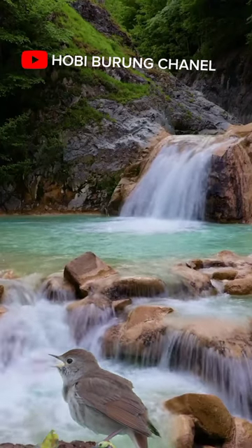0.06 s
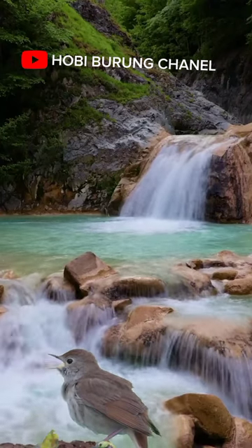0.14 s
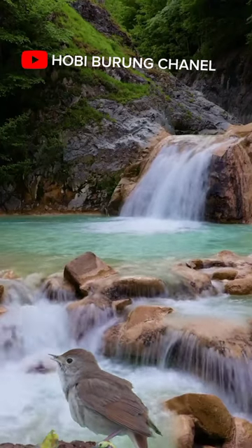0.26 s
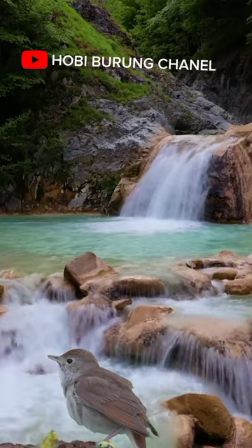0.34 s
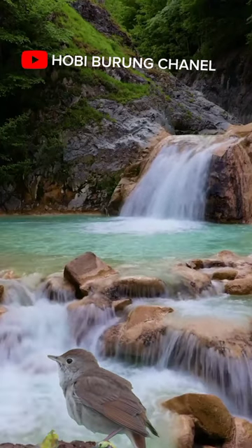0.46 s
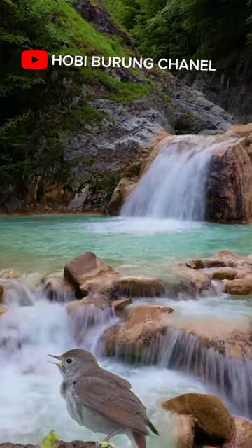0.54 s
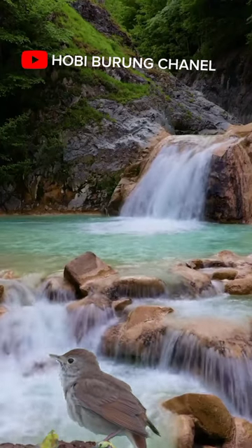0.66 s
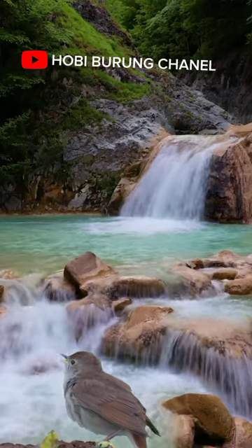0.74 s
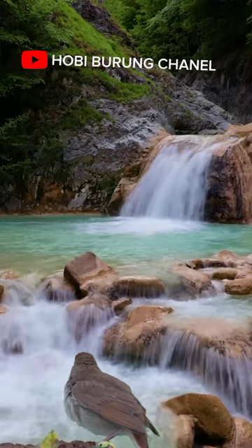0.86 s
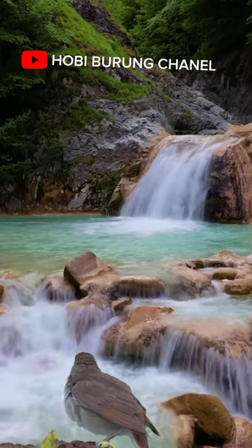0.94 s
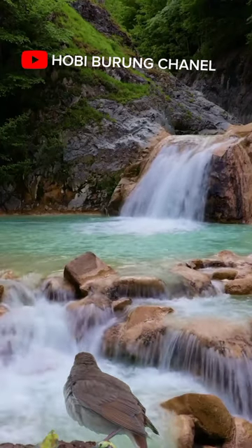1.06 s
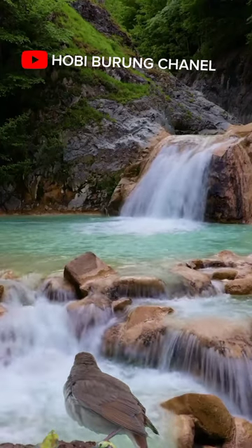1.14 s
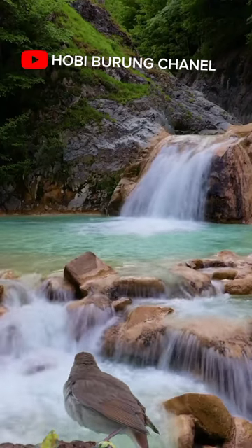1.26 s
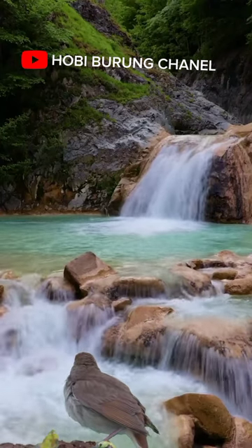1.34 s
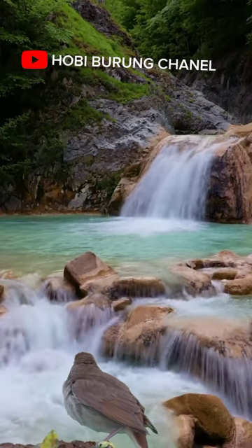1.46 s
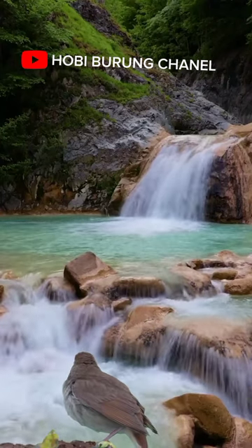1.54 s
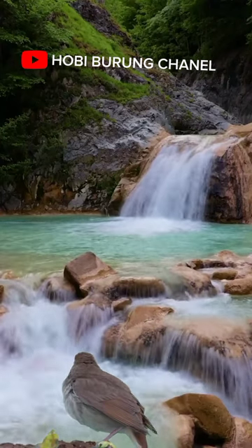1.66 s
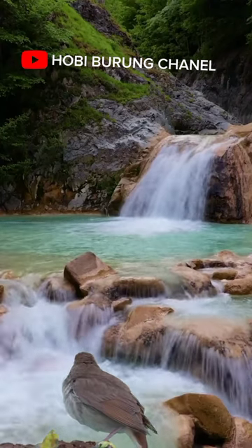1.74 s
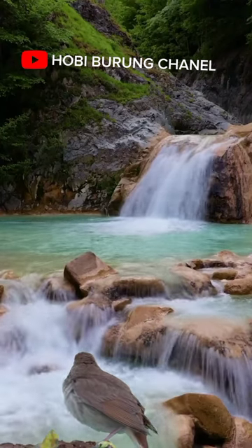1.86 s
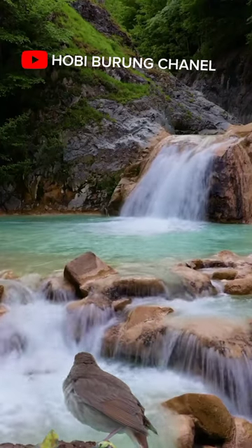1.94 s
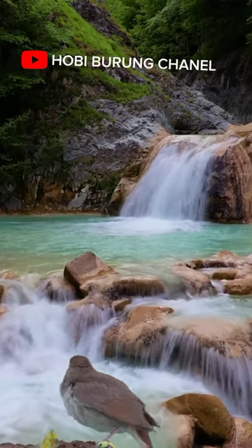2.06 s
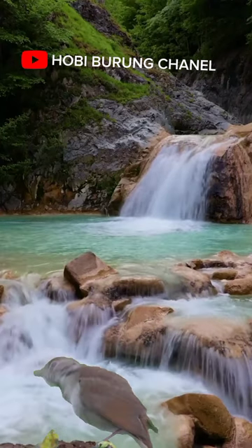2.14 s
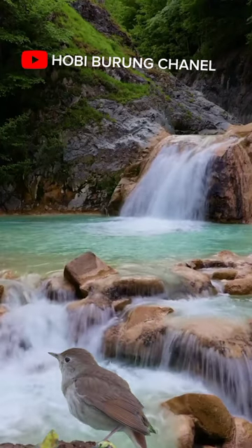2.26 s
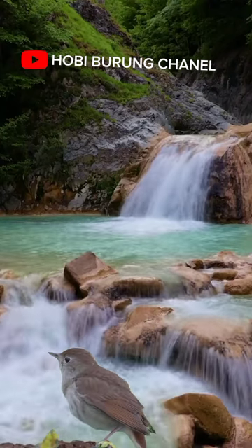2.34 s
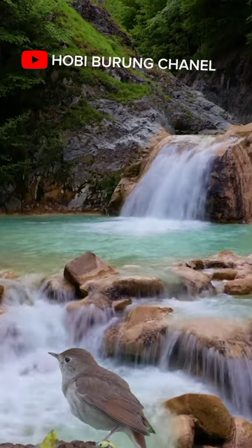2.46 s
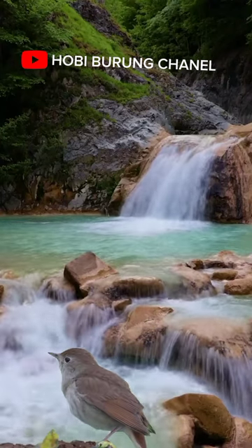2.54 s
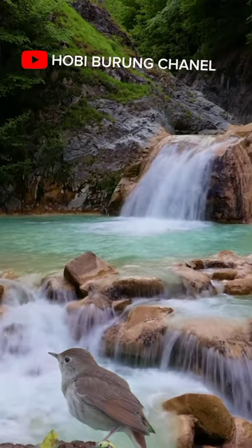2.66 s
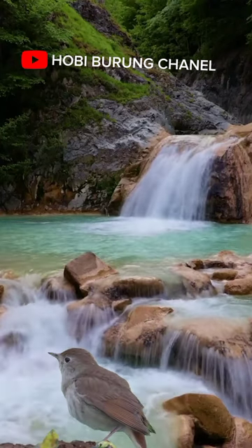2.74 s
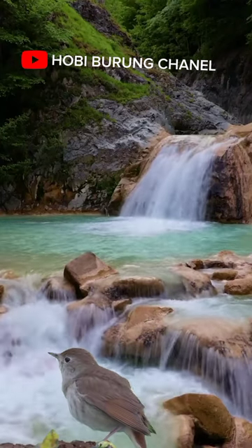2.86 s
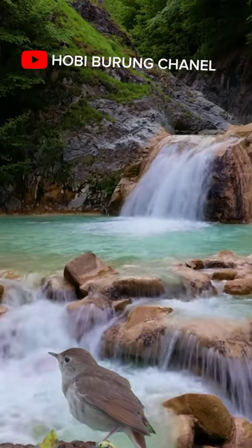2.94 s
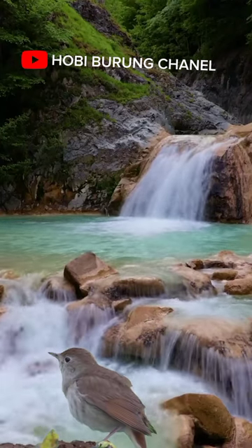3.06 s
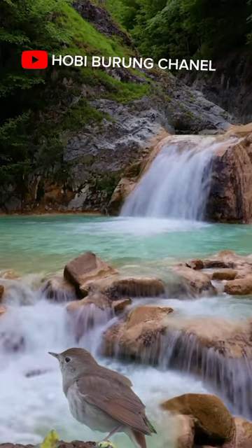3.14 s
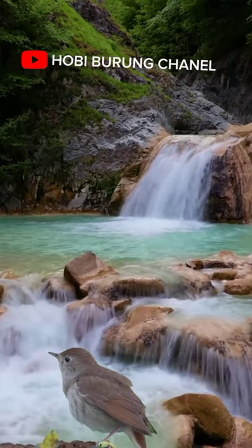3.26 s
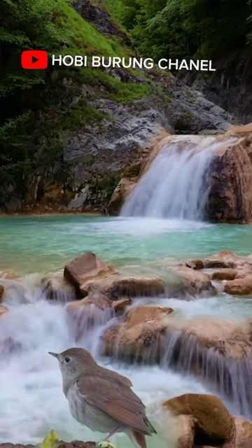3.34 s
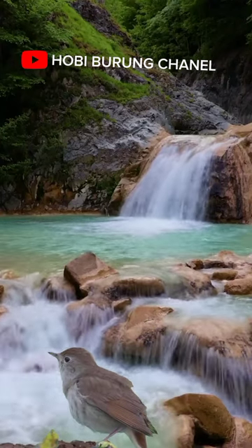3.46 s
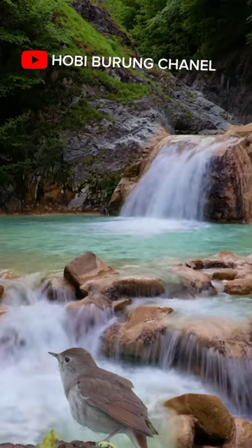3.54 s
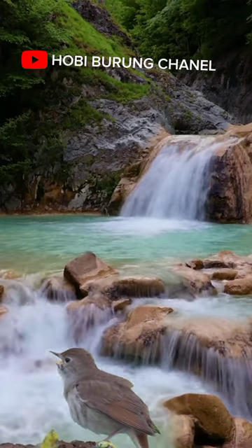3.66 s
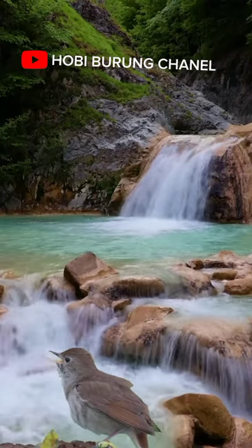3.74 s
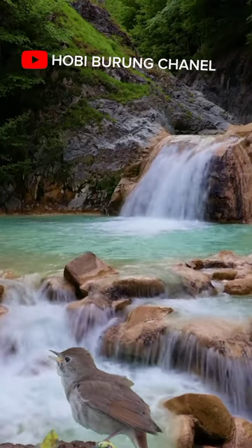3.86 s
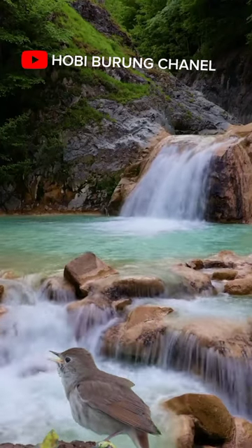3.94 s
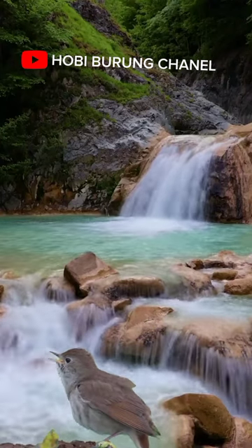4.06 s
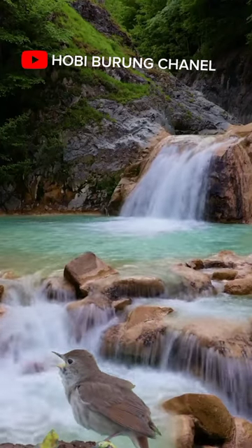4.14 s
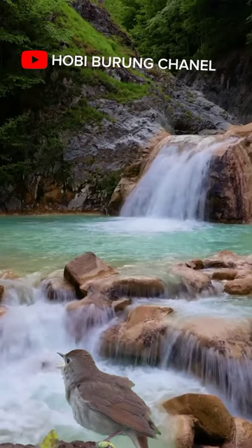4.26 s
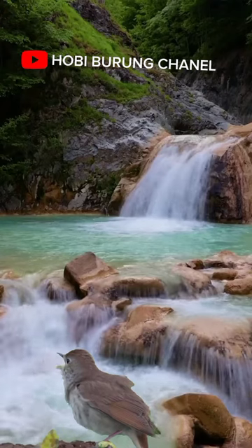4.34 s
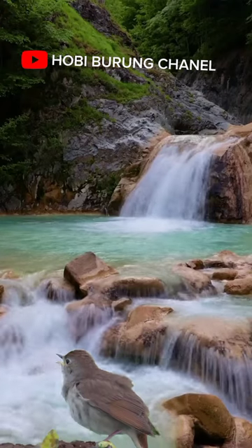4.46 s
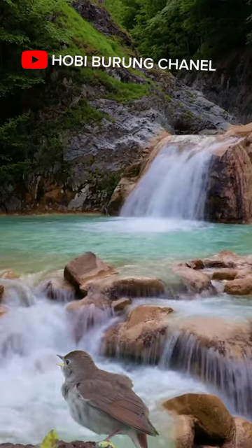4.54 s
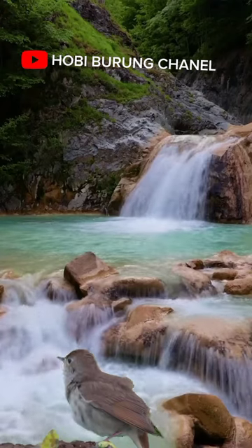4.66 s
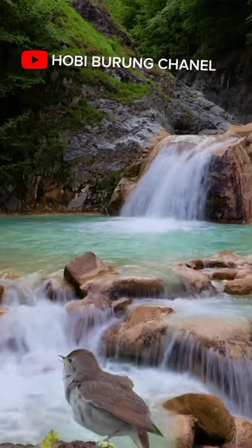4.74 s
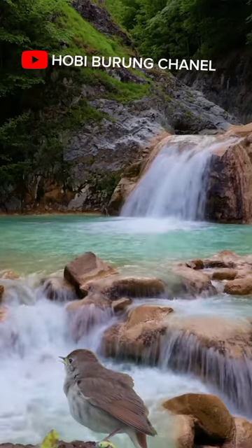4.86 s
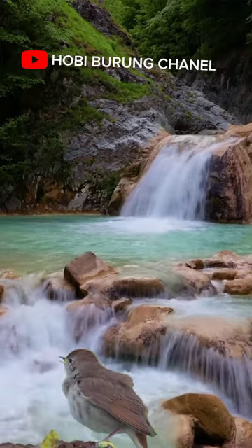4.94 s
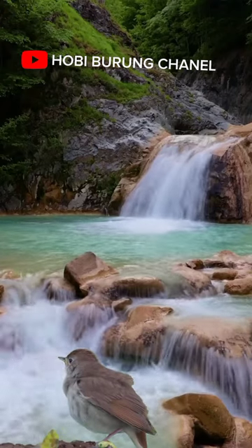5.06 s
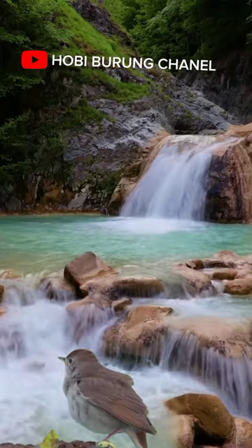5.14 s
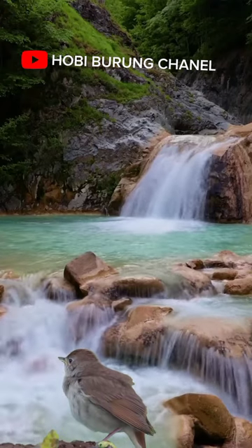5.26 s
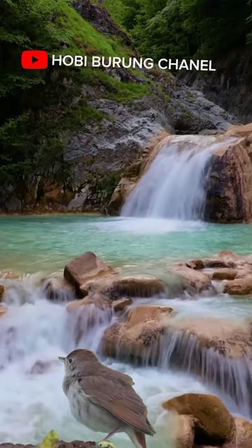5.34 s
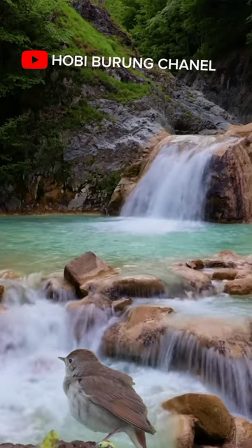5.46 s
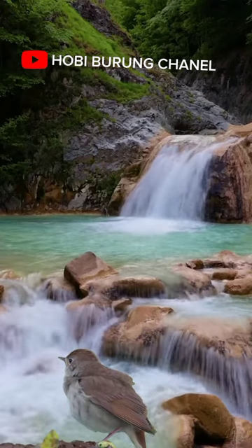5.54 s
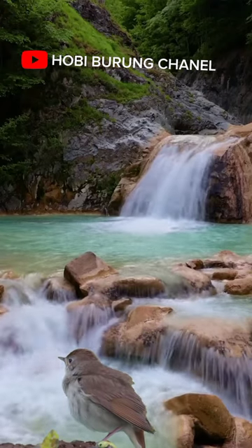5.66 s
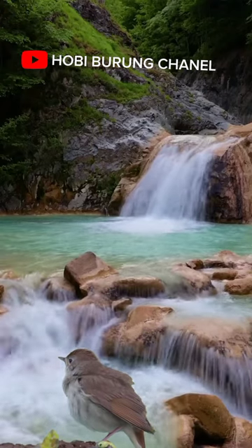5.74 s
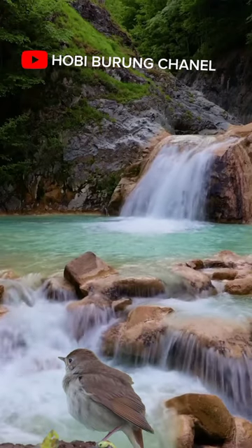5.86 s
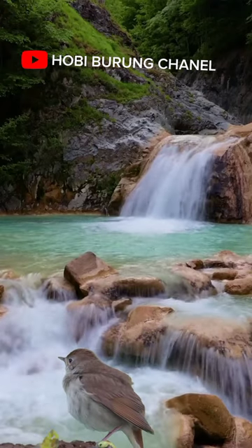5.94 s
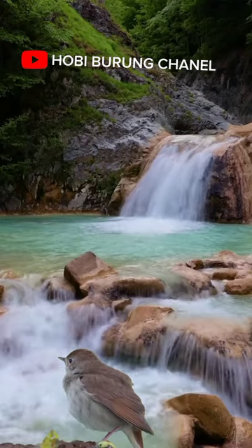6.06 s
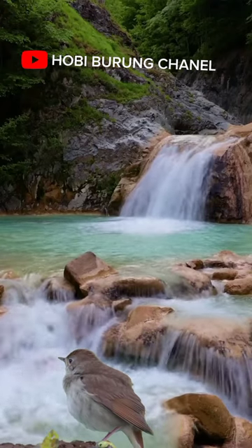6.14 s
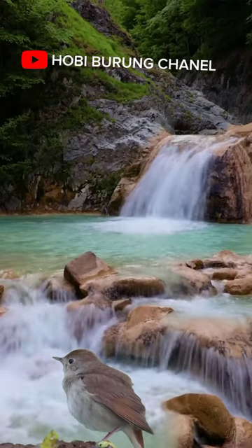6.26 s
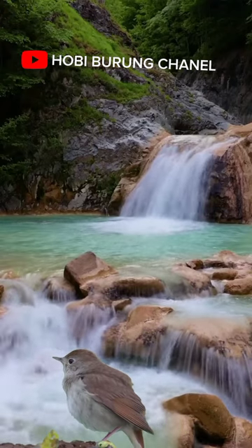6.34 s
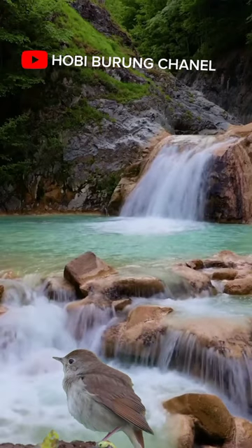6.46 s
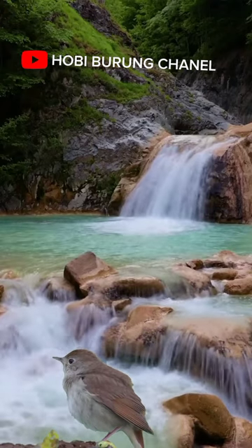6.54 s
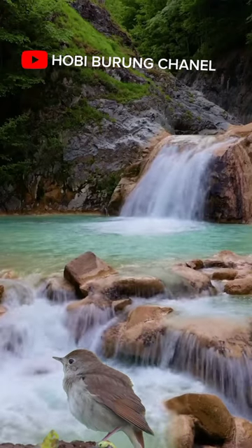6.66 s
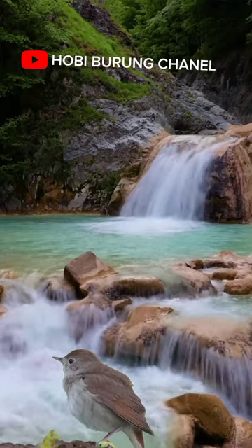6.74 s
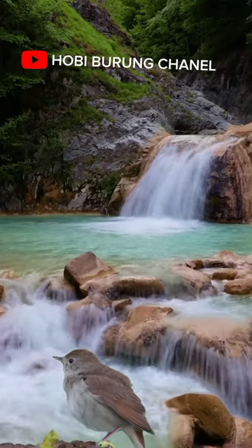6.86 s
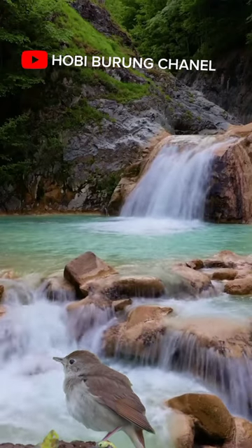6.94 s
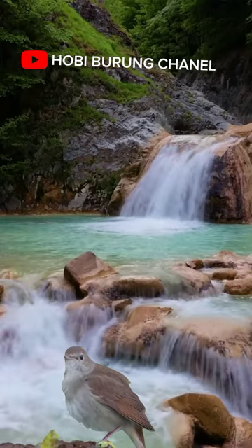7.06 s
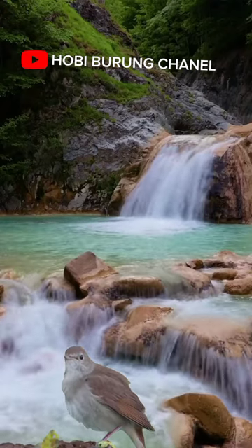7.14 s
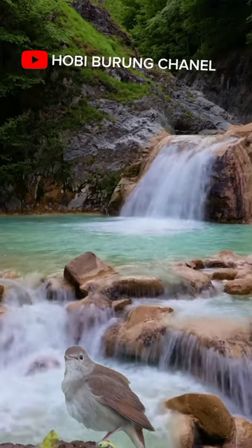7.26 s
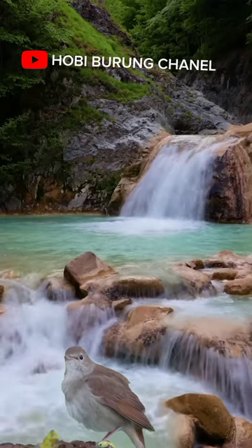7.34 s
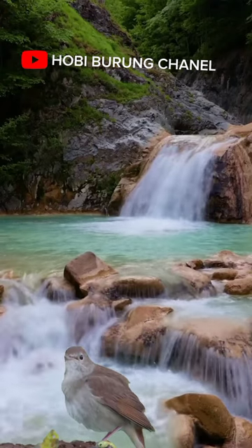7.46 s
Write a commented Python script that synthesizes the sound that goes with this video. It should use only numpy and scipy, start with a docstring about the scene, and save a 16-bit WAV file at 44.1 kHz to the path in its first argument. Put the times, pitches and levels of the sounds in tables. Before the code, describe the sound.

Outdoors, close stereo pickup, with a faint low distant rush throughout and a slight short woodland echo. At 0 s a nightingale is already singing: a soft whistle, thin high warble, then two loud bright chirps at 0.18-0.25 s. Two squeaky two-voiced arches come at 0.31 and 0.43, three small low hoops from 0.57, and a quick slurred whistle at 0.67. Tiny bill snaps and soft chirps fade into faint sighs by 1.4 s. A pause follows, with weak distant bird calls near 2.3 and 2.7. At 3.5 a harsh buzz launches six loud, rapid falling notes, 3.65-4.03, about fourteen per second, then four sharper rising notes with high hooks, 4.08-4.43. A high chirp, upward whistle at 4.65 and low warble at 4.75 follow. Thin sinking whistles, brief pips and soft twitters dwindle from 5 to 6.4 s, leaving quiet air and faint far calls until about 7.5.

```python
"""A nightingale sings two phrases close by: whistles, arcs, warbles, a harsh buzz and loud repeated notes.
Each note is a sine that follows a pitch curve, with overtones, roughness and a hiss of breath.
Both sides of its syrinx (the voice organ) sound, at times together; soft twitters trail each phrase.
Noise bursts make the bill snaps, decaying noise the faint woodland echo, and shaped noise the thin
bands of hiss and the low, distant outdoor rush."""
import sys
import numpy as np
from scipy import signal
from scipy.fft import rfft, irfft, next_fast_len
from scipy.io import wavfile
from scipy.ndimage import uniform_filter1d, map_coordinates

SR = 44100
rng = np.random.default_rng(int(sys.argv[2]) if len(sys.argv) > 2 else 0)


def int16_out(signal):
    """Quantize to a 16-bit WAV file."""
    q = np.round(np.clip(np.atleast_2d(signal).T, -1, 1) * 32767)
    wavfile.write(sys.argv[1], SR, q.astype(np.int16))


N = 331191

# distant rush, its colour: (frequency [Hz], relative level [dB])
RUSH_COLOUR = [(15, -38.5), (25, -10), (53, -3.5), (86, -10), (152, -2.5), (204, -8), (267, -7.5),
               (567, -9.5), (826, -7.5), (1080, -11), (2560, -22.5), (4040, -26.5), (4500, -26.5),
               (5280, -28.5), (15500, -34)]
# how alike the rush is in both ears: (frequency [Hz], likeness [0 to 1])
RUSH_LIKENESS = [(60, 0.99), (150, 1), (380, 1), (950, 0.82), (2380, 0.68), (5980, 0.48), (15000, 0.81)]
# how far the rush leads on the left: (frequency [Hz], lead [radians])
RUSH_LEAD = [(50, .05), (200, .15), (500, 0.24), (1000, 0.18), (3000, 1)]
# low rumbles: (time [s], length [s], level [dB])
RUMBLES = [(1.18, .18, -49), (2.838, 0.15, -48), (4.352, .115, -47.5), (5.263, 0.25, -52)]
# colour of the rumbles: (frequency [Hz], relative level [dB])
RUMBLE_COLOUR = [(20, -12), (42, 4), (100, -7), (170, -11.5), (300, -15), (1000, -79)]
# faint bands of hiss: (time [s], length [s], centre [Hz], width [Hz], start level [dB], end level [dB])
HISS_BANDS = [(.172, .043, 3700, 1798, -38, -17), (3, 0.26, 5600, 294, -65, -69),
              (3.321, 0.25, 5500, 1715, -58, -61), (3.511, 0.043, 5670, 2500, -56, -20),
              (3.563, .05, 2970, 646, -41, -34), (4.458, 0.042, 7650, 1200, -44, -31),
              (4.905, 0.103, 2620, 800, -51.5, -38), (5.326, 0.213, 2430, 804, -62, -42),
              (5.598, 0.87, 5700, 452, -63, -64.5), (5.6, 0.89, 7260, 700, -68, -63.5),
              (5.732, 0.32, 2830, 600, -57, -69)]
# woodland echo: (frequency [Hz], time to die by 60 dB [s])
ECHO_DECAY = [(500, 0.406), (2500, 0.41), (6000, 0.28), (14000, 0.058)]
# haze swelling in ahead of the notes: (frequency [Hz], time to rise by 60 dB [s])
HAZE_RISE = [(1500, 1.1), (2600, 0.9), (5000, 1.14), (8000, 1.05), (14000, 1.64)]
# bands cancelled by nearby reflections: (frequency [Hz], width [Hz])
CANCELLED_BANDS = [(1935, 110), (2690, 91), (3350, 40)]
# how far the bird leads on the left: (frequency [Hz], lead [radians])
BIRD_LEAD = [(100, 0.016), (1500, 0.33), (2200, 0.34), (2650, 0.6), (3100, 0.77), (4600, 1), (5800, 1),
             (7500, .9), (11000, 0.79)]
# stereo balance of the bird by frequency: (frequency [Hz], left minus right [dB])
BIRD_TILT = [(60, -2), (110, -3), (200, -2), (380, -1), (700, -3), (1290, 2), (2380, -0.5), (4400, 0.5),
             (8120, 0), (15000, 1)]
# the bird turns its head: (time [s], left minus right [dB])
HEAD_TURN = [(0, .5), (.5, -1), (.6, -2), (.9, 0), (4.2, -0.5), (4.65, -1), (5.1, 1.5), (5.7, -1)]
# bill snaps: (time [s], level before the trim in bill_snaps() [dB])
BILL_SNAPS = [(0.7547, -40), (0.7614, -37.5), (0.7856, -39.5), (0.7924, -40.5), (4.7651, -32.5)]
# colour of the snaps: (frequency [Hz], relative level [dB])
SNAP_COLOUR = [(1500, -33.5), (3000, 5.5), (4200, -7), (5900, -1.5), (8000, -23), (15000, -13.5)]
# colour of the breathy part of the song: (frequency [Hz], relative level [dB])
BREATH_COLOUR = [(1000, -38), (2700, -0.5), (3800, -3), (5500, -3), (8000, -6.5), (10000, -6),
                 (12000, -6.5), (14000, -2.5), (15500, -9.5)]
# richness in overtones: (pitch of the note [Hz], boost of its overtones [dB])
RICHNESS = [(2000, 3), (2600, -9), (3500, 9.5), (4700, 7), (7000, 5)]
# how the open bill radiates overtones: (overtone frequency [Hz], boost [dB])
OPEN_BILL = [(3000, 2.5), (5500, 1.5), (8000, -3), (11000, -8.5), (12800, 2.5), (14000, 16), (15500, 5)]

# soft pip, its shape: (time after onset [s], pitch [Hz], level [dB])
PIP = [(0, 1987, -13.5), (.005, 2188, 0.5), (.013, 2196, -1.5), (.022, 2200, -3.5), (.029, 2080, -20.5)]
# falling note, its shape: (time after onset [s], pitch [Hz], level [dB])
FALL = [(0, 2540, -32), (.004, 2553, -14), (.012, 2517, -11.5), (.02, 2280, -9.5), (.026, 2067, -12.5),
        (.031, 1675, -26), (.036, 1350, -40)]
# rising note, its shape: (time after onset [s], pitch [Hz], level [dB])
RISE = [(0, 2780, -27), (.005, 2910, -13), (.011, 3036, -11), (.016, 3210, -8.5), (.021, 3338, -12),
        (.027, 3463, -17), (.035, 3540, -23.5), (.043, 3490, -37.5)]
# hook that the other side of the syrinx adds to every rise: (time after onset [s], pitch [Hz], level [dB])
HOOK = [(.026, 4710, -32.5), (.035, 4834, -23.5), (.043, 4735, -21), (.051, 4550, -26), (.059, 4050, -34)]
# upper voice of an arch sung by both sides at once: (time after onset [s], pitch [Hz], level [dB])
ARCH_HIGH = [(0, 2890, -39), (.008, 4800, -33), (.017, 7600, -34.5), (.027, 7950, -33.5), (.047, 7250, -31),
             (.061, 6200, -36.5), (.068, 4700, -44)]
# lower voice of the same arch: (time after onset [s], pitch [Hz], level [dB])
ARCH_LOW = [(.005, 2670, -37.5), (.02, 5150, -39.5), (.035, 5350, -35.5), (.053, 5100, -39),
            (.067, 2904, -39.5)]
# small low hoop, its shape: (time after onset [s], pitch [Hz], level [dB])
HOOP = [(0, 1574, -0.5), (.007, 1990, 0.5), (.014, 2080, -0.5), (.023, 1506, -6.5)]
# when the pips come: (onset [s], added level [dB], pitch [ratio])
PIPS = [(5.748, -27.5, .98), (5.779, -28, .99), (5.808, -29.5, 1), (5.838, -30, 1), (5.867, -33, 1),
        (5.893, -33, 0.99), (5.921, -33, 1.005), (5.946, -31, .98), (5.974, -33.5, .98)]
# when the falls come: (onset [s], added level [dB], pitch [ratio])
FALLS = [(3.654, -2.5, 1.024), (3.725, 0, 1.007), (3.795, 0, 1.018), (3.863, -.5, 0.99), (3.930, 0, 1),
         (3.998, 0.5, 1.03)]
# when the rises and hooks come: (onset [s], added level [dB], pitch [ratio])
RISES = [(4.084, 0.0029, 1), (4.179, 0.0083, 1.006), (4.274, 0.0065, .995), (4.372, 0, 1)]
# when the arches come: (onset [s], added level [dB], pitch [ratio])
ARCHES = [(.309, -0.16, 1), (0.43, -1.5, 0.98)]
# when the hoops come: (onset [s], added level [dB], pitch [ratio])
HOOPS = [(.57, -28, 0.99), (.601, -24.5, 1.02), (.633, -22.5, 1.06)]
# repertoire: (shape, repeats, rasp [dB], sweep widening with each repeat [share])
SYLLABLES = [(FALL, FALLS, -37, 0), (RISE, RISES, -28, 0.12), (HOOK, RISES, -13, -.1), (PIP, PIPS, -30, 0),
             (ARCH_HIGH, ARCHES, -8, 0), (ARCH_LOW, ARCHES, -9.5, 0), (HOOP, HOOPS, -29, .1)]

# short slurred whistle: (time [s], pitch [Hz], rms level before SLUR_DB [dB])
SWOOP = [(.663, 1690, -29.5), (.669, 2232, -21.5), (.675, 2757, -17), (.681, 2757, -21), (.697, 2275, -37)]
# faint upward slide: (time [s], pitch [Hz], rms level before SLUR_DB [dB])
SLIDE = [(4.41, 1718, -50), (4.436, 1785, -48), (4.448, 1995, -49.5), (4.47, 3866, -42), (4.486, 4014, -44),
         (4.52, 3754, -51.5)]
# whistle that sweeps up: (time [s], pitch [Hz], rms level before SLUR_DB [dB])
UPSWEEP = [(4.611, 1300, -49), (4.627, 1520, -30), (4.643, 1867, -28.5), (4.655, 2203, -17.5),
           (4.669, 2510, -20), (4.681, 2560, -24.5), (4.697, 2484, -40.5)]
# long whistle that sinks: (time [s], pitch [Hz], rms level before SLUR_DB [dB])
LONG_WHISTLE = [(4.951, 3138, -47.5), (4.987, 3065, -38.5), (5.019, 2330, -39), (5.037, 2275, -37.5),
                (5.089, 2223, -43), (5.099, 2290, -39.5), (5.227, 2325, -44.5), (5.241, 2115, -42),
                (5.247, 2050, -45)]
# shorter sinking whistle: (time [s], pitch [Hz], rms level before SLUR_DB [dB])
SHORT_WHISTLE = [(5.526, 2559, -44.5), (5.572, 2430, -37.5), (5.624, 2430, -42), (5.636, 2170, -41),
                 (5.644, 2000, -43.5)]
# last faint whistle: (time [s], pitch [Hz], rms level before SLUR_DB [dB])
LAST_WHISTLE = [(6.08, 1782, -44.5), (6.104, 2277, -40.5), (6.15, 2306, -45), (6.17, 2130, -45.5),
                (6.186, 2000, -51.5)]
# held notes that glide evenly: (time [s], length [s], start pitch [Hz], end pitch [Hz], level [dB])
HELD_NOTES = [(0.042, .134, 2250, 2510, -32.5), (0.15, .4, 1600, 1510, -51), (.884, .09, 2114, 2047, -45),
              (0.973, .14, 1830, 1707, -56), (4.246, .07, 3820, 4050, -44),
              (4.698, .036, 2063, 1950, -32.5), (5.451, .029, 2000, 2086, -36.5),
              (5.472, .026, 2720, 2752, -30), (5.499, .033, 2070, 2210, -31),
              (5.557, 0.049, 3020, 3030, -44), (6.295, .13, 1950, 1987, -44.5)]
# two-voiced drooping sighs:
# (time [s], length [s], upper pitch [Hz], droop [share], start level [dB], fading [dB])
SIGHS = [(.972, .19, 4806, .135, -46.5, -1.5), (1.321, 0.045, 3000, 0.013, -38.5, 9.5),
         (5.207, .168, 4570, .08, -47.5, 4.5)]
# quick chirps:
# (time [s], length [s], start [Hz], middle [Hz], end pitch [Hz], peak level [dB], rasp [dB])
CHIRPS = [(.003, 0.017, 3620, 5260, 5580, -33.5, 4.5), (0.177, .038, 2194, 3125, 5097, -11.5, -15.5),
          (0.223, .023, 3180, 3226, 2560, -15.5, -31.5), (0.849, 0.025, 3000, 3950, 5250, -38, -11),
          (0.862, 0.019, 1840, 2390, 2100, -33, -17.5), (.874, .011, 5040, 4300, 2990, -37, -13),
          (1.276, 0.021, 2150, 1730, 1340, -37, -24), (4.479, .031, 8300, 7080, 6370, -26.5, -19)]
# small birds far off: (time [s], length [s], middle pitch [Hz], peak level [dB])
FAR_CALLS = [(2.308, .082, 2780, -53), (2.737, .06, 2900, -57), (5.655, .023, 6000, -51),
             (6.03, .06, 5720, -52.5), (6.59, 0.02, 4850, -60), (6.657, 0.021, 4650, -56.5),
             (6.763, 0.02, 4580, -51.5), (6.901, 0.025, 4500, -51), (7.424, .065, 6600, -55.5)]
# warbled notes: (time [s], length [s], start, middle, end pitch [Hz], start, middle, end level [dB],
# rasp [dB], swing rate [per s], swing [Hz])
WARBLES = [ (0.066, 0.05, 7550, 7160, 6050, -28.5, -24.5, -39.5, -12, 149, 476),
           (0.25, 0.073, 2220, 2440, 2560, -37, -37.5, -42, -21, 53.5, 336),
           (3.534, 0.077, 5680, 5580, 5090, -31.5, -21.5, -27.5, -0.5, 84.9, 752),
           (4.733, .188, 2070, 2136, 2143, -34, -32, -34.5, -35, 55.7, 128),
           (4.837, 0.099, 7000, 6870, 6880, -49, -41, -55, -26, 24.4, 265)]

SLUR_DB, SLUR_RASP_DB, HELD_RASP_DB = 2, -37.5, -27
LOWER_RATIO, LOWER_DB, SIGH_RASP_DB = 0.852, -2.5, -33.5  # a sigh's second voice against its first
CHIRP_SWELL_DB = 10  # the middle of a chirp over its ends
FAR_SWELL_DB, FAR_SAG, FAR_RASP_DB = 6.5, 0.047, -16  # sag: share of pitch above at start, below at end
TOP_HZ = 15830
HALVES = np.array([[0.5], [-0.5]])  # shares a left-minus-right difference between the two sides


def amp(db):
    """Turn decibels into gain."""
    return 10 ** (np.asarray(db) / 20)


def unit(x):
    """Scale a sound to an rms of 1."""
    return x / np.sqrt(np.mean(x ** 2) + 1e-20)


def along(points, hz):
    """Read a (Hz, value) curve on a log frequency axis."""
    f, value = np.transpose(points)
    return np.interp(np.log(hz + 1), np.log(f + 1), value)


def filtered(x, response):
    """Multiply the spectrum of a sound by a response, which may be complex."""
    n = x.shape[-1]
    padded = next_fast_len(n + SR // 10)
    spectrum = rfft(x, padded) * response(np.fft.rfftfreq(padded, 1 / SR))
    return irfft(spectrum, padded)[..., :n]


def noise(colour, channels=2):
    """Coloured noise of rms 1, unrelated between channels."""
    white = rng.standard_normal((channels, N))
    return unit(filtered(white, lambda hz: amp(along(colour, hz))))


def wobble(rate):
    """A smooth random curve with this many random points a second."""
    points = rng.standard_normal(N // 4)
    return map_coordinates(points, [np.arange(N) * rate / SR], order=2, mode="wrap")


def add(track, s, x):
    """Mix a sound into the track from time s [s]."""
    part = track[..., max(round(s * SR), 0):][..., :x.shape[-1]]
    part += x[..., :part.shape[-1]]


def clock(length):
    """Sample times [s] of a short sound."""
    return np.arange(int(length * SR)) / SR


def fade(t, edge):
    """Open and close a sound softly over edge [s]."""
    to_nearest_end = np.minimum(t, t[-1] - t)
    return np.sin(np.pi / 2 * np.clip(to_nearest_end / edge, 0, 1))


def ports(hz, lead):
    """Shift the phase at the left and right microphones, as for sound arriving at a slant."""
    return np.exp(0.5j * along(lead, hz) * np.array([[1], [-1]]))


def background(air_db=-51, balance_db=-1, waver_db=0.5):
    """A distant rush of noise, nearly steady and a little to the right, with a few low rumbles."""
    a, b = noise(RUSH_COLOUR)

    # a shared and an opposed part set how alike the two sides are
    def turn(hz):
        return np.arccos(np.clip(along(RUSH_LIKENESS, hz), -1, 1)) / 2

    mid = filtered(a, lambda hz: np.cos(turn(hz)))
    side = filtered(b, lambda hz: np.sin(turn(hz)))
    rush = unit(filtered(np.array([mid + side, mid - side]), lambda hz: ports(hz, RUSH_LEAD)))
    rush_level = amp(air_db + waver_db * wobble(5.4) + balance_db * HALVES)
    swell = np.zeros(N)
    for s, length, db in RUMBLES:
        add(swell, s, amp(db) * fade(clock(length), 0.018))
    return rush * rush_level + swell * noise(RUMBLE_COLOUR, channels=1)


def hiss_bands(flicker_db=3.5):
    """Faint bands of hiss: noise around one frequency, flickering in level."""
    out = np.zeros((2, N))
    for s, length, centre_hz, width_hz, start_db, end_db in HISS_BANDS:
        t = clock(length)
        white = rng.standard_normal((2, SR))
        band = filtered(white, lambda hz: 1 / (1 + (2 * (hz - centre_hz) / width_hz) ** 4))
        level_db = start_db + (end_db - start_db) * t / length
        add(out, s, unit(band)[:, :len(t)] * amp(level_db) * fade(t, 0.013))
    return out * amp(flicker_db * wobble(40))


def diffuse(x, decay):
    """Smear a sound into a stereo noise tail in which each frequency dies at its own speed."""
    hz, t, grains = signal.stft(rng.standard_normal((2, SR // 2)), SR, nperseg=256)
    dying = grains * amp(-60 * t / along(decay, hz)[:, None])
    tail = signal.istft(dying, SR, nperseg=256)[1]
    return signal.fftconvolve(x, tail / np.linalg.norm(tail[0]), axes=1)[:, :N]


def haze(bird, haze_db=-20, blur_db=-18, blur_t60=0.28):
    """Backward tails: a haze of its own pitch swells in before each note, thickest just before it."""
    backward = bird[:, ::-1]
    slow = amp(haze_db) * diffuse(backward, HAZE_RISE)
    quick = amp(blur_db) * diffuse(backward, [(3000, blur_t60)])
    return (slow + quick)[:, ::-1]


def path(hz):
    """From perch to microphones: narrow cancellations, then a slanting arrival."""
    holes = np.ones(len(hz), complex)
    for centre, width in CANCELLED_BANDS:
        gap = centre * centre - hz * hz
        holes *= gap / (gap + 1j * hz * width)
    return holes * ports(hz, BIRD_LEAD) * amp(along(BIRD_TILT, hz) * HALVES)


def bill_snaps(t60=0.025, trim_db=-4):
    """The bill shuts with tiny dry snaps: bursts of noise that die by 60 dB in t60 [s]."""
    blows, t = np.zeros(N), clock(0.035)
    for s, db in BILL_SNAPS:
        add(blows, s, amp(db + trim_db - 60 * t / t60))
    return blows * noise(SNAP_COLOUR, channels=1)


def arc(length, pitches, levels):
    """One gesture: pitch bends through three points while the effort follows three levels."""
    t = clock(length)
    u = t / length
    bend = np.polyfit([0, 0.5, 1], pitches, 2)
    return t, np.polyval(bend, u), np.interp(u, [0, 0.5, 1], levels)


def slur(shape):
    """A gesture gliding smoothly through (s, Hz, dB) points: start, times, pitch, level."""
    at, pitch, level = np.transpose(shape)
    t = clock(at[-1] - at[0])
    glide = uniform_filter1d(np.interp(at[0] + t, at, pitch), size=220, mode="nearest")
    return at[0], t, glide, np.interp(at[0] + t, at, level)


def twitters():
    """Chirps, far calls and warbles: short arcs of pitch; a warble also swings up and down quickly."""
    for s, length, start_hz, middle_hz, end_hz, db, rasp_db in CHIRPS:
        levels = [db - CHIRP_SWELL_DB, db, db - CHIRP_SWELL_DB]
        yield s, *arc(length, [start_hz, middle_hz, end_hz], levels), rasp_db
    for s, length, hz, db in FAR_CALLS:
        pitches = [hz * (1 + FAR_SAG), hz, hz * (1 - FAR_SAG)]
        levels = [db - FAR_SWELL_DB, db, db - FAR_SWELL_DB]
        yield s, *arc(length, pitches, levels), FAR_RASP_DB
    for s, length, *row in WARBLES:
        t, hz, db = arc(length, row[:3], row[3:6])
        rasp_db, rate, swing_hz = row[6:]
        yield s, t, hz - swing_hz * np.cos(2 * np.pi * rate * t), db, rasp_db


def whistles():
    """Clear slurs, held notes, and sighs in which the two voices keep a fixed interval."""
    for shape in (SWOOP, SLIDE, UPSWEEP, LONG_WHISTLE, SHORT_WHISTLE, LAST_WHISTLE):
        s, t, hz, rms_db = slur(shape)
        # a sine peaks at twice its mean power
        yield s, t, hz, rms_db + 10 * np.log10(2) + SLUR_DB, SLUR_RASP_DB
    for s, length, start_hz, end_hz, db in HELD_NOTES:
        t = clock(length)
        yield s, t, np.linspace(start_hz, end_hz, len(t)), db, HELD_RASP_DB
    for s, length, upper_hz, droop, db, fading_db in SIGHS:
        t = clock(length)
        hz = upper_hz * (1 - droop * (t / length) ** 2.6)
        level = db - fading_db * t / length
        yield s, t, hz, level, SIGH_RASP_DB
        yield s, t, hz * LOWER_RATIO, level + LOWER_DB, SIGH_RASP_DB


def repeated():
    """Each syllable keeps its shape; strength, pitch and the width of the sweep vary between repeats."""
    for shape, repeats, rasp_db, widening in SYLLABLES:
        delay, t, hz, level = slur(shape)
        for k, (s, db, ratio) in enumerate(repeats):
            widened = hz + k * widening * (hz - hz.mean())
            yield s + delay, t, ratio * widened, level + db, rasp_db


def gestures():
    """Every note as (onset, times, pitch, level, rasp)."""
    return [*repeated(), *whistles(), *twitters()]


def song(second_db=-39, third_db=-44, fourth_db=-46, jitter=0.0072, flutter_db=1.36,
         hiss_db=-4, edge=0.0013, ease=0.015):
    """The syrinx gives a nearly pure tone; rasp roughens it and adds a hiss of air."""
    voice, air_power = np.zeros(N), np.zeros(N)
    drift, flutter, shake, grit = wobble(220), wobble(160), wobble(1400), wobble(1400)
    for s, t, hz, db, rasp_db in gestures():
        here = round(s * SR) + np.arange(len(t))
        phase = 2 * np.pi * np.cumsum(hz * (1 + jitter * drift[here])) / SR
        # long notes open and close more gently
        effort = amp(db + flutter_db * flutter[here]) * fade(t, edge + ease * t[-1])
        roughness = shake[here] * np.sin(phase) + grit[here] * np.cos(phase)
        tone = np.sin(phase) + amp(rasp_db) * roughness
        # richness depends on pitch, and the overtones shake in phase
        richness_db = along(RICHNESS, hz)
        for k, over_db in ((2, second_db), (3, third_db), (4, fourth_db)):
            overtone = np.sin(k * (phase + 0.25 * shake[here]))
            strength = amp(over_db + richness_db + along(OPEN_BILL, k * hz))
            tone += strength * overtone * (k * hz < SR / 2)
        add(voice, s, effort * tone)
        add(air_power, s, (effort * amp(rasp_db + hiss_db)) ** 2)
    # breath that is partly shared by both sides
    hiss = unit(noise(BREATH_COLOUR, channels=1) + noise(BREATH_COLOUR))
    # the air flow starts and stops more slowly than the tone
    air_flow = np.sqrt(np.abs(uniform_filter1d(air_power, size=400)))
    return voice + air_flow * hiss


def scene(echo_db=-29):
    """The near bird with its haze and echo, the hiss bands and the background."""
    facing_db = np.interp(np.arange(N) / SR, *np.transpose(HEAD_TURN)) * HALVES
    bird = amp(facing_db) * filtered(song() + bill_snaps(), path)
    echo = amp(echo_db) * diffuse(bird, ECHO_DECAY)
    return bird + haze(bird) + echo + hiss_bands() + background()


def record(dry):
    """The recorder keeps nothing above its band limit."""
    return filtered(dry, lambda hz: hz < TOP_HZ)


dry = scene()
out = record(dry)
int16_out(out)
```